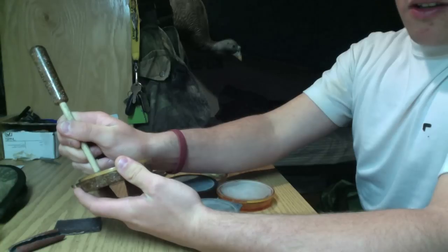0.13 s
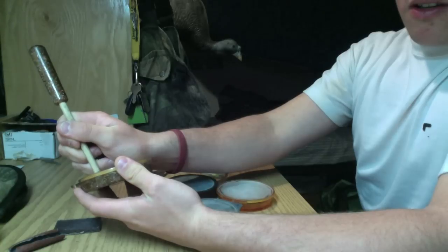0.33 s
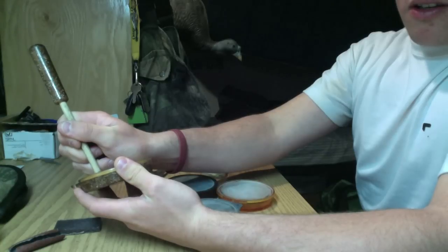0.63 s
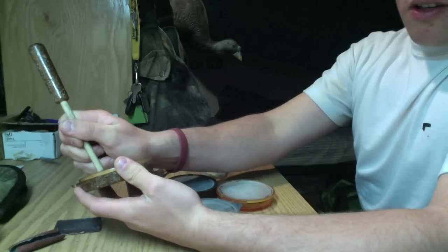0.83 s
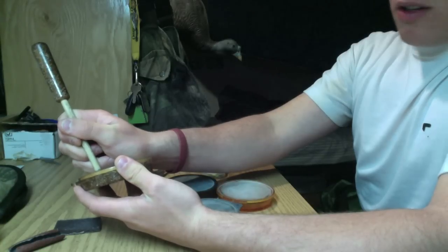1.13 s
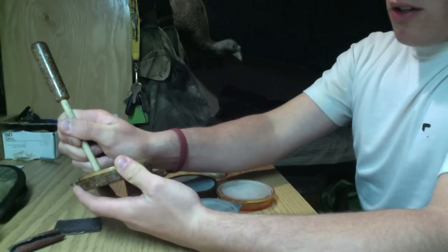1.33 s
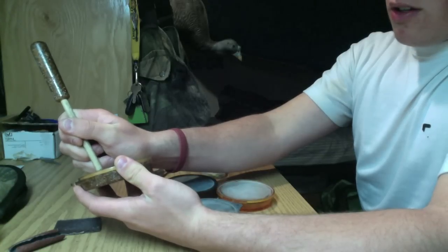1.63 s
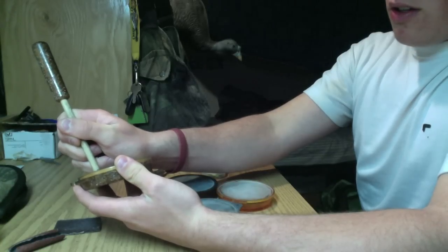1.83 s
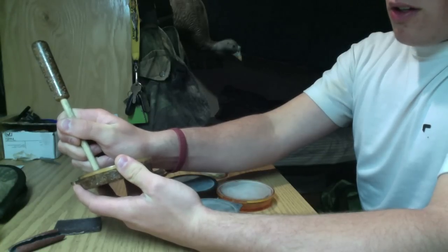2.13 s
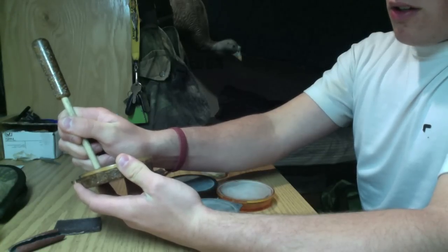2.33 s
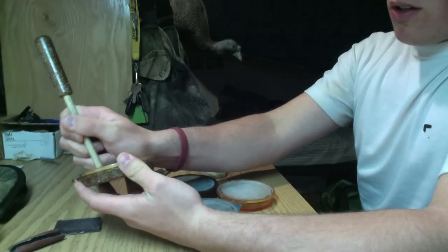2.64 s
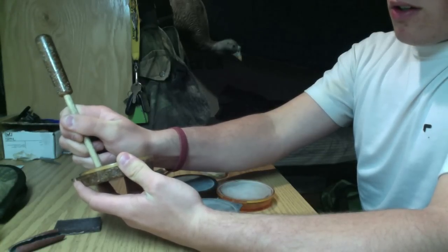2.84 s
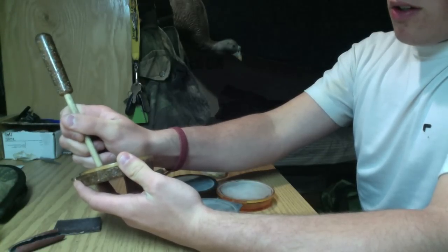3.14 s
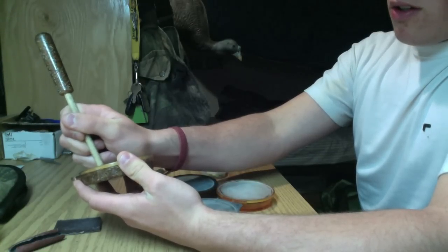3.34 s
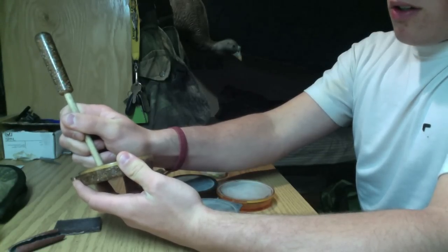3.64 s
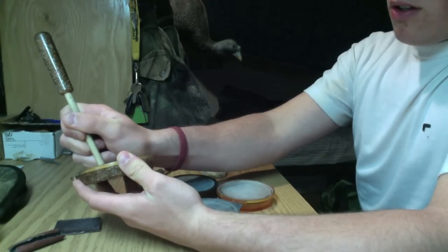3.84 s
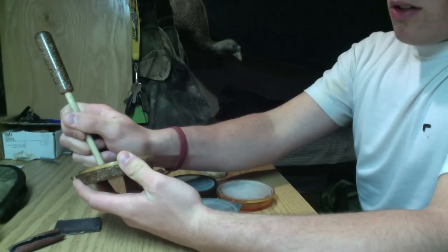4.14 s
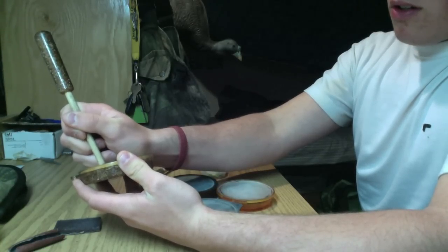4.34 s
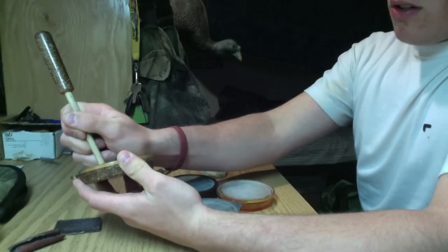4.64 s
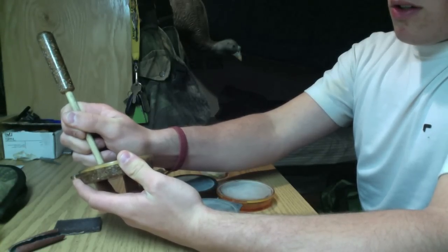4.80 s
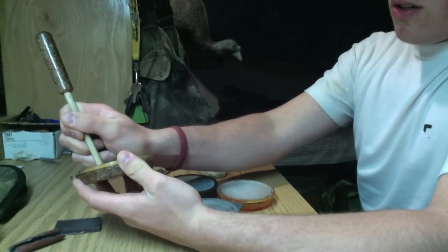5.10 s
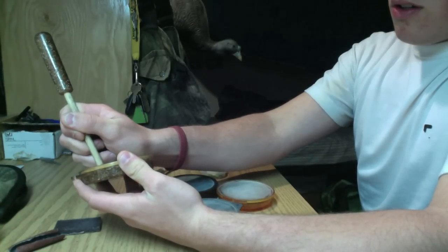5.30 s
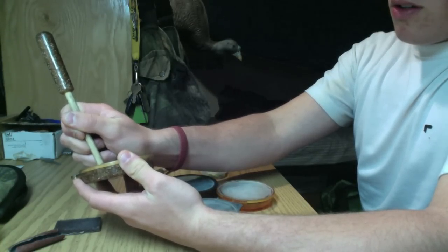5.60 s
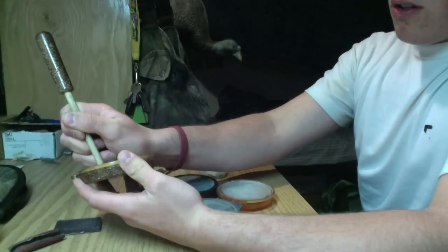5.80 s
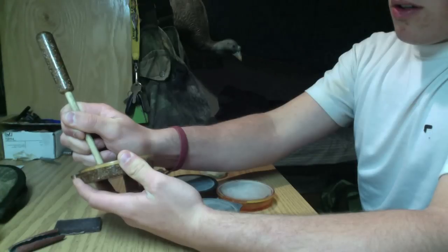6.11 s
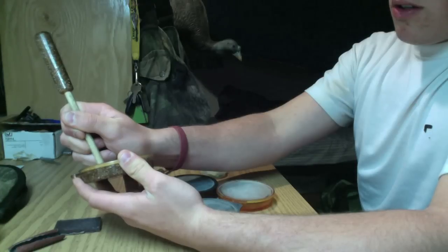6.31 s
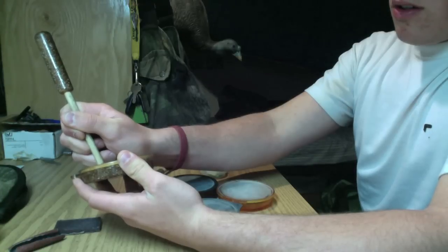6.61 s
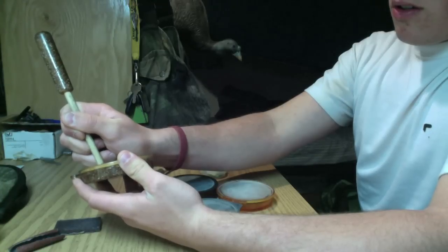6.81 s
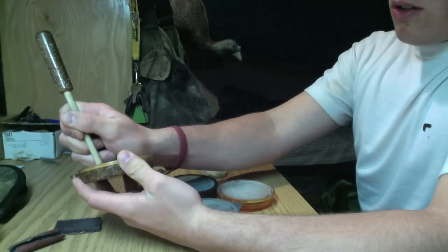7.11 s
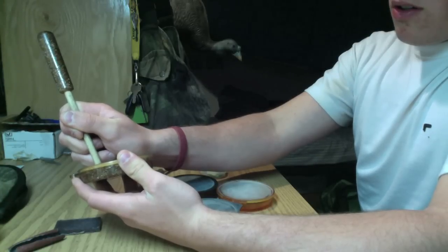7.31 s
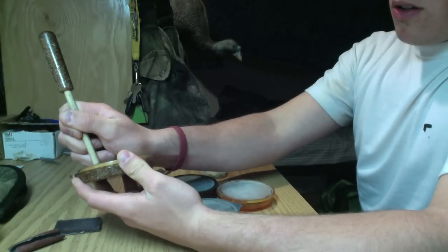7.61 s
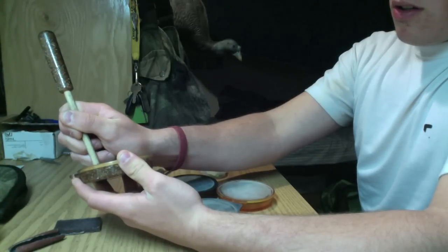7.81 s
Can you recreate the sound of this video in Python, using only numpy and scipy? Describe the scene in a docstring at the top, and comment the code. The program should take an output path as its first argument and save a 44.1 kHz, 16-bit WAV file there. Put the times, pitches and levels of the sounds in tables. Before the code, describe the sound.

A wooden striker is scraped on a slate pot call, close to the microphone in a small room with a very soft hush. Three faint peeps in the first 0.4 seconds lead straight into four quick turkey-like clucks that grow louder. Another brief cluster of peeps and clucks comes between 1.2 and 1.6 seconds. From 1.8 to 4.5 seconds the call gives about eleven short yelps, roughly four a second, each a high squeal that breaks downward into a rasp. They are loudest from about 2.3 to 3.1 seconds and then ease off, with a couple of small scratchy ticks as the tip lands on the slate. Single sharp, loud clucks follow at about 5.3, 6.1, 6.4, 6.6 and 7.9 seconds, with a faint peep near 7.6. The hardest strokes distort slightly, and each has a short, bright room reflection.

```python
"""A slate pot call, close up in a small room: peeps and clucks, a run of raspy yelps, then sharp clucks.
A wooden striker sticks and slips on the slate about 520-940 times a second; the pot rings mostly
with the second harmonic of that rate. As the tip digs in, the pitch breaks downward and turns raspy.
A soft hush lies underneath; the hardest strokes overload the preamplifier."""
import sys
import numpy as np
from scipy import signal
from scipy.fft import rfft, irfft
from scipy.io import wavfile

SR = 44100
rng = np.random.default_rng(int(sys.argv[2]) if len(sys.argv) > 2 else 0)


def dump(signal):
    """Clip the signal to [-1, 1] and save it as 16-bit WAV at the path in sys.argv[1]."""
    limited = np.clip(np.atleast_2d(signal).T, -1, 1)
    pcm = np.round(limited * 32767).astype(np.int16)
    wavfile.write(sys.argv[1], SR, pcm)


N = 350595
TIME_S = np.arange(N) / SR

# Room hush. Each row: frequency in Hz, relative spectral density in dB.
HUSH_SPECTRUM = [(15, -53.5), (25, -20), (70, -35.5), (107, -4), (156, -3.5), (222, -3), (260, -8.5),
                 (380, -8), (412, -5.5), (600, -10.5), (786, -5.5), (1280, -10.5), (3750, -19), (4060, -21),
                 (15600, -48.5)]
# Each row: time in seconds, hush level in dB.
HUSH_LEVEL = [(0, -62), (1.1, -60.5), (2, -59.5), (4.6, -60), (5.25, -66), (5.55, -61.5), (6.1, -66),
              (6.9, -61), (7.85, -67.5)]
# Spectra of near scatter, room tail and far echo. Each row: frequency in Hz, gain in dB.
SCATTER_COLOUR = [(500, -18.5), (1500, -15), (3000, -7), (5000, -6), (9000, -4), (14000, -6.5)]
TAIL_COLOUR = [(300, -18.5), (900, -16.5), (1400, -11), (2200, -12), (3700, -16.5), (5200, -6.5),
               (8000, -14), (14000, -19.5)]
ECHO_COLOUR = [(500, -31.5), (1500, -30), (4000, -26.5), (8000, -23.5), (11000, -9.5), (14000, -15.5)]
# Their decays. Each row: frequency in Hz, T60 in seconds.
SCATTER_DECAY = [(1500, .045), (5500, 0.05), (12000, .05)]
TAIL_DECAY = [(300, 1.16), (1400, 0.19), (3700, 0.29), (7000, 0.23), (14000, 1.2)]
ECHO_DECAY = [(1500, 0.093), (11000, .05)]
# Resonances of slate, pot and striker. Each row: frequency in Hz, half width in Hz, gain in dB.
POT_MODES = [(718, 36, -44.5), (957.5, 45, -38.5), (995, 49, -30), (1350.5, 58, -2), (1528, 41, -6.5),
             (1614, 50, -9.5), (1750.5, 64, -16), (1855, 80, -23), (2180, 95, -29.5), (2810, 100, -26),
             (3684, 111, -26), (4450, 140, -43.5), (5590, 680, -57.5), (7434, 550, -58.5),
             (10400, 1800, -68)]
# Striker landings. Each row: start in seconds, force level in dB.
LANDINGS = [(0.133, -26), (1.792, -13), (3.695, -3), (4.512, -5.5), (7.545, -23)]
# Light strokes. Each row: start, length and time to peak in seconds, first and last slip rate in Hz,
# drive and edge in dB. Edge is slip sharpness: the gain of the grit and of harmonics 3 and up.
PEEP_STROKES = [ (.2381, 0.016, .0046, 667, 638, -29.3, -15), (.3018, 0.025, .008, 660, 778, -31.5, -13),
                (0.3595, .023, .003, 720, 742, -30, -12), (1.232, 0.04, 0.021, 652, 777, -28.5, -6),
                (1.295, 0.023, 0.016, 758, 780, -14.5, -2.5), (3.412, .024, 0.0082, 706, 694, -16.5, -3.5),
                (7.5475, 0.0066, .001, 776, 703, -27.5, -12), (7.605, .016, .001, 750, 727, -36, -7), ]
# Short jabs. Each row: start, length and time to lowest pitch in seconds, lowest slip rate in Hz,
# upward creep in Hz per second, drive, late swell and edge in dB.
CLUCK_STROKES = [(0.4332, 0.019, 0.0067, 633, 10530, -7.5, 2, -3.5),
                 (0.5106, 0.032, 0.0098, 702.5, 5340, -6.5, -4, 0),
                 (0.6037, 0.037, 0.011, 581, 3500, -2.5, 1.5, 1.5),
                 (0.6893, 0.046, 0.011, 572.5, 2750, 0.43, 2.5, 5),
                 (1.406, 0.035, 0.0096, 695, 4570, -5.5, 4, -0.5),
                 (1.5311, 0.03, 0.0092, 550.5, 5140, 2, 0.85, 5),
                 (5.2984, 0.033, 0.0074, 519.5, 5840, -0.96, -1.3, 4.5),
                 (6.1202, 0.0344, 0.007, 531.7, 4440, 6.5, -3, 5),
                 (6.4319, 0.03, 0.0087, 607.2, 3120, 1.04, 0, 7.5),
                 (6.6414, 0.031, 0.011, 592.7, 2570, 6, -1.5, 7),
                 (7.8912, 0.025, 0.011, 622.5, 2600, 7.5, -0.1, 5.5)]
# Long strokes. Each row: start, length, time to break and time to lowest pitch in seconds,
# opening and lowest slip rate in Hz, drive, late swell and edge in dB.
YELP_STROKES = [(1.3182, 0.053, 0.01, 0.021, 769, 746, -10, 1, -1),
                (1.822, 0.085, 0.022, 0.03, 716.5, 571, -16, 7.5, -1.5),
                (2.0779, 0.059, 0.014, 0.028, 834, 693.2, -3, 3, 2),
                (2.304, 0.078, 0.021, 0.043, 882, 572.8, 5, -3, 5.5),
                (2.5416, 0.078, 0.021, 0.045, 922, 589.1, 5.5, -2.5, 6),
                (2.7743, 0.065, 0.018, 0.038, 941.6, 722.3, 7.5, 2.1, 3),
                (3.027, 0.079, 0.026, 0.039, 876, 720, 5.5, 0.0, 2.5),
                (3.2974, 0.077, 0.029, 0.06, 858.5, 725, -0.14, 2.7, -0.5),
                (3.5803, 0.085, 0.0151, 0.0361, 774, 590.5, -3, -5, 2),
                (3.84, 0.088, 0.024, 0.056, 770, 593.4, -6, -0.5, 3.0),
                (4.127, 0.078, 0.038, 0.057, 763, 611, -8.5, 3.5, 1),
                (4.4019, 0.045, 0.015, 0.024, 754.5, 686, -11, 4, 1)]

BAND_LIMIT_HZ = 15850
JAB_HZ, CATCH_HZ, FREE_HZ = 821.6, 739, 793.3  # slip rates: tip starts, catches, comes free
STALL_HZ, STALL_DB_PER_HZ = 710, 0.07
CATCH_S, CLUCK_LIFT_S, YELP_LIFT_S = .0045, .008, .011
SQUEAL_SAG_HZ_PER_S, YELP_CREEP_HZ_PER_S = 1200, 900
BREAK_S, BREAK_SHARE = 0.0064, 0.51  # sudden part of the pitch drop
LIGHT_DB, HELD_SHARE = -6, .33  # share of the drive above LIGHT_DB held back until the break
# Drive and edge offsets by stroke phase.
PEEP_TOUCH_DB, PEEP_LIFT_DB = -9.5, -10
CLUCK_TOUCH_DB, CATCH_DB, CLUCK_LIFT_DB = -15, -4, -10.5
YELP_TOUCH_DB, YELP_SQUEAL_DB, YELP_LIFT_DB = -15, 1.2, -7
TOUCH_EDGE_DB, SQUEAL_EDGE_DB, DUG_EDGE_DB, LIFT_EDGE_DB = -6.5, -1.37, 1, -3


def amp(db):
    """Decibels to gain."""
    return 10 ** (np.asarray(db) / 20)


def unit_rms(x):
    """Scales to rms 1."""
    return x / np.sqrt(np.mean(x ** 2) + 1e-20)


def lookup(table, hz):
    """Interpolates on a log-frequency axis."""
    table_hz, values = np.transpose(table)
    return np.interp(np.log(hz + 1), np.log(table_hz + 1), values)


def add(mix, start_s, sound):
    """Mixes a sound in at start_s."""
    part = mix[round(start_s * SR):][:len(sound)]
    part += sound[:len(part)]


def wander(top_hz):
    """Random curve of rms 1, rolled off above top_hz."""
    hz = np.fft.rfftfreq(N, 1 / SR)
    return unit_rms(irfft(rfft(rng.standard_normal(N)) / (1 + (hz / top_hz) ** 4), N))


def room_hush():
    """Soft noise that slowly swells and sinks."""
    gain = amp(lookup(HUSH_SPECTRUM, np.fft.rfftfreq(N, 1 / SR)))
    hush = irfft(rfft(rng.standard_normal(N)) * gain, N)
    return unit_rms(hush) * amp(np.interp(TIME_S, *np.transpose(HUSH_LEVEL)))


def reflections(x, colour, decay, delay_s, rise_s):
    """A dense cloud of echoes that dies band by band."""
    hz, t, noise = signal.stft(rng.standard_normal(SR * 3 // 4), SR, nperseg=128)
    t60_s = lookup(decay, hz)[:, None]
    envelope = amp(-60 * t / t60_s) * np.sqrt(2 * np.log(1000) / (t60_s * SR))  # unit energy
    response = signal.istft(noise * envelope * amp(lookup(colour, hz))[:, None], SR, nperseg=128)[1]
    response *= np.minimum(np.arange(len(response)) / SR / rise_s, 1)
    echoes = np.zeros(N)
    add(echoes, delay_s, signal.oaconvolve(x, response))
    return echoes


def room(x):
    """Bright scatter off hands and table top, the room's tail, and a faint echo from its far side."""
    scatter = reflections(x, SCATTER_COLOUR, SCATTER_DECAY, delay_s=0.001209, rise_s=0.0021)
    tail = reflections(x, TAIL_COLOUR, TAIL_DECAY, delay_s=.005, rise_s=0.008)
    echo = reflections(x, ECHO_COLOUR, ECHO_DECAY, delay_s=0.078, rise_s=0.0034)
    return scatter + tail + echo


def landing(level_db, decay_s=0.0051):
    """A short scrape as the tip meets the slate."""
    t = np.arange(SR // 40) / SR
    return amp(level_db) * rng.standard_normal(len(t)) * np.exp(-t / decay_s)


def stall_db(low_hz):
    """Drive lost as the tip digs in and the slips slow down."""
    return STALL_DB_PER_HZ * max(STALL_HZ - low_hz, 0)


def peep(start_s, length_s, peak_s, first_hz, last_hz, drive_db, edge_db):
    """Corners of a glide too light to dig in."""
    peak_hz = first_hz + (last_hz - first_hz) * peak_s / length_s
    return [(start_s, first_hz, drive_db + PEEP_TOUCH_DB, edge_db),
            (start_s + peak_s, peak_hz, drive_db, edge_db),
            (start_s + length_s, last_hz, drive_db + PEEP_LIFT_DB, edge_db)]


def cluck(start_s, length_s, lowest_s, low_hz, creep_hz_per_s, drive_db, swell_db, edge_db):
    """Corners of a jab: the tip catches at once, digs in, stalls and springs free."""
    dug_s = max(length_s - CLUCK_LIFT_S - lowest_s, 0)
    creep_hz = creep_hz_per_s * dug_s
    stalled_db = drive_db + swell_db / 2 - stall_db(low_hz)
    return [(start_s, JAB_HZ, drive_db + CLUCK_TOUCH_DB, edge_db + TOUCH_EDGE_DB),
            (start_s + min(CATCH_S, lowest_s), CATCH_HZ, drive_db + CATCH_DB, edge_db + SQUEAL_EDGE_DB),
            (start_s + lowest_s, low_hz, drive_db, edge_db),
            (start_s + lowest_s + dug_s / 2, low_hz + creep_hz / 2, stalled_db, edge_db),
            (start_s + lowest_s + dug_s, low_hz + creep_hz, drive_db + swell_db, edge_db),
            (start_s + length_s, FREE_HZ, drive_db + swell_db + CLUCK_LIFT_DB, edge_db + LIFT_EDGE_DB)]


def yelp(start_s, length_s, break_s, lowest_s, top_hz, low_hz, drive_db, swell_db, edge_db):
    """Corners of a squeal that sags as the push grows, breaks to a rasp, flicks up as the tip lifts."""
    opening_db = drive_db - HELD_SHARE * max(drive_db - LIGHT_DB, 0)
    squeal_hz = top_hz - SQUEAL_SAG_HZ_PER_S * break_s
    broken_hz = squeal_hz + BREAK_SHARE * (low_hz - squeal_hz)
    lift_s = max(length_s - YELP_LIFT_S, lowest_s)
    lift_hz = low_hz + YELP_CREEP_HZ_PER_S * (lift_s - lowest_s)
    return [(start_s, top_hz, opening_db + YELP_TOUCH_DB, edge_db + TOUCH_EDGE_DB),
            (start_s + break_s, squeal_hz, opening_db + YELP_SQUEAL_DB, edge_db + SQUEAL_EDGE_DB),
            (start_s + min(break_s + BREAK_S, lowest_s), broken_hz, drive_db, edge_db),
            (start_s + lowest_s, low_hz, drive_db - stall_db(low_hz), edge_db + DUG_EDGE_DB),
            (start_s + lift_s, lift_hz, drive_db + swell_db, edge_db),
            (start_s + length_s, FREE_HZ, drive_db + swell_db + YELP_LIFT_DB, edge_db + LIFT_EDGE_DB)]


def stick_slip(corners, jitter, shimmer, grit, jitter_depth=.021, shimmer_depth=0.24,
               sharpening=0.32, grit_db=-5, puff_cycles=0.53, ramp_s=.003):
    """Start time and force of one stroke: a train of slips, each shedding a puff of grit."""
    corner_s, corner_hz, drive_db, edge_db = np.transpose(corners)
    first = round((corner_s[0] - ramp_s / 2) * SR)
    end = min(round((corner_s[-1] + ramp_s / 2) * SR), N)
    span = np.arange(first, end)
    t = span / SR
    slip_hz = np.interp(t, corner_s, corner_hz)
    drive = amp(np.interp(t, corner_s, drive_db))
    edge = amp(np.interp(t, corner_s, edge_db))
    # Slips turn uneven when slow under a hard push, and while the pitch breaks.
    dug_in = np.interp(slip_hz, [620, 730], [1, 0]) * np.minimum(drive, 1) ** 0.94
    glide = np.tanh(abs(np.gradient(slip_hz)) * SR / 15000)
    roughness = .38 + .55 * dug_in + 0.27 * glide
    cycles = np.cumsum(slip_hz * (1 + jitter_depth * roughness * jitter[span])) / SR
    order = np.arange(1, 25)[:, None]
    harmonics = np.cos(2 * np.pi * order * cycles) * (order * slip_hz < BAND_LIMIT_HZ)
    # A harder push makes slips more abrupt: more treble, more grit.
    harmonics *= drive ** (sharpening * np.log2(np.maximum(order / 4, 1)))
    puffs = unit_rms(np.exp(-(cycles % 1) / puff_cycles)) * grit[span] * drive ** (sharpening / 2)
    force = harmonics[:2].sum(0) + edge * (harmonics[2:].sum(0) + amp(grit_db) * roughness * puffs)
    contact = np.clip(np.minimum(t - t[0], t[-1] - t) / ramp_s, 0, 1)
    flutter = np.exp(shimmer_depth * roughness * shimmer[span])
    return t[0], contact * drive * force * flutter


def pot(force, low_hz=600, top_hz=12500, fft_size=8192):
    """The force rings the pot's resonances; so small a body radiates little bass."""
    hz = np.fft.rfftfreq(fft_size, 1 / SR)
    gain = sum(amp(db) / (1 + ((hz - mode_hz) / width_hz) ** 2) for mode_hz, width_hz, db in POT_MODES)
    gain = gain / np.sqrt(1 + (low_hz / (hz + 1)) ** 8) / np.sqrt(1 + (hz / top_hz) ** 12)
    # Minimum phase: the ring follows its cause.
    cepstrum = irfft(np.log(gain + 1e-5))
    cepstrum[1:fft_size // 2] *= 2
    cepstrum[fft_size // 2 + 1:] = 0
    ring = irfft(np.exp(rfft(cepstrum)))[:fft_size // 2]
    return signal.oaconvolve(force, ring)[:N]


def slate_call(grit_hz=2600, grit_gain=4.1):
    """Strokes and landings drive the pot; the slate's fine grain makes the grit bright."""
    force = np.zeros(N)
    jitter = wander(top_hz=350) + .75 * wander(top_hz=90)
    shimmer = wander(top_hz=200)
    grit = grit_gain * signal.lfilter(*signal.butter(1, grit_hz, "high", fs=SR), rng.standard_normal(N))
    for gesture, strokes in (yelp, YELP_STROKES), (cluck, CLUCK_STROKES), (peep, PEEP_STROKES):
        for row in strokes:
            add(force, *stick_slip(gesture(*row), jitter, shimmer, grit))
    for start_s, level_db in LANDINGS:
        add(force, start_s, landing(level_db))
    return pot(force)


def scene():
    """The call and its reflections, mono."""
    call = slate_call()
    return (call + room(call))[None]


def record(dry, ceiling=0.9, knee=16.0, bass_cut_hz=210):
    """The preamplifier flattens crests, a bass cut tilts them; then hush, hard clip and low-pass."""
    flattened = dry / (1 + abs(dry / ceiling) ** knee) ** (1 / knee)
    tilted = signal.lfilter(*signal.butter(2, bass_cut_hz, "high", fs=SR), flattened)
    clipped = np.clip(tilted + room_hush(), -1, .98)
    low_pass = signal.firwin(501, BAND_LIMIT_HZ, window=("kaiser", 8), fs=SR)
    return signal.oaconvolve(clipped, low_pass[None], "same")


dry = scene()
out = record(dry)
dump(out)
```